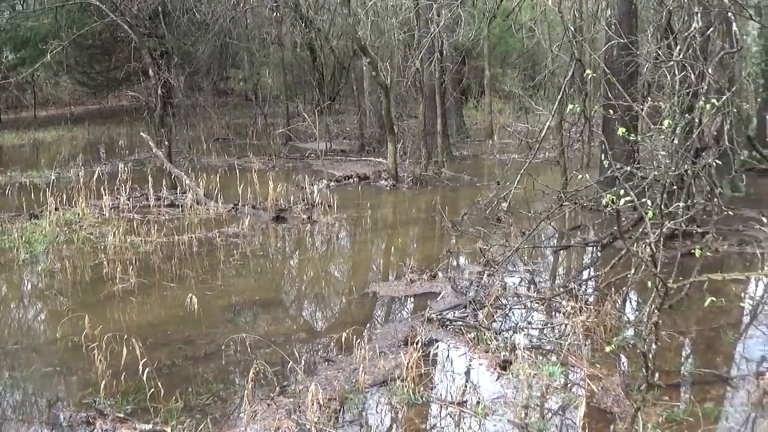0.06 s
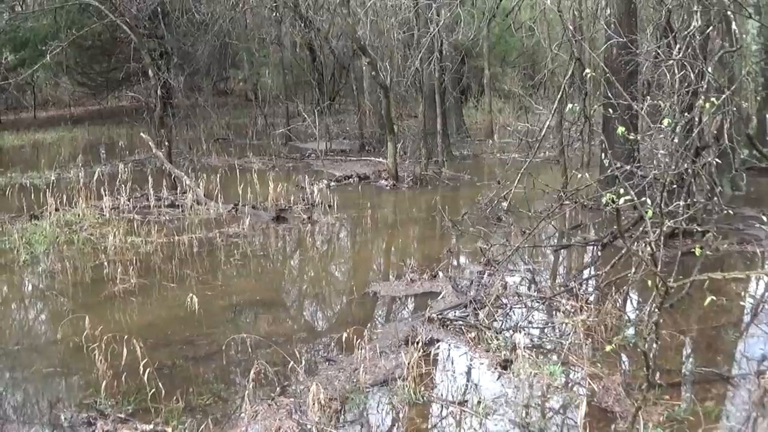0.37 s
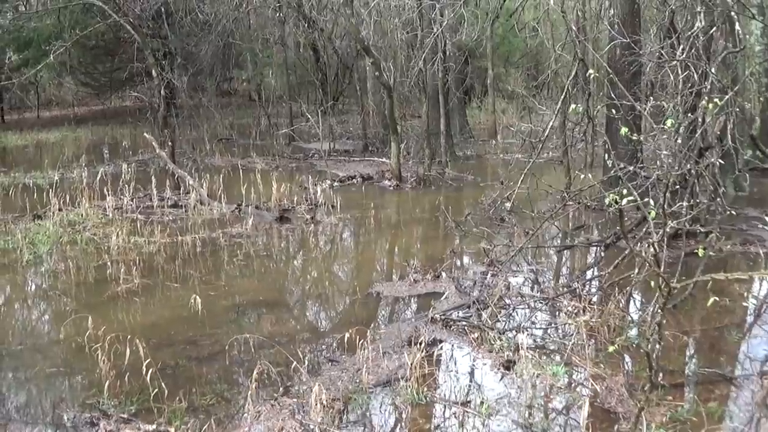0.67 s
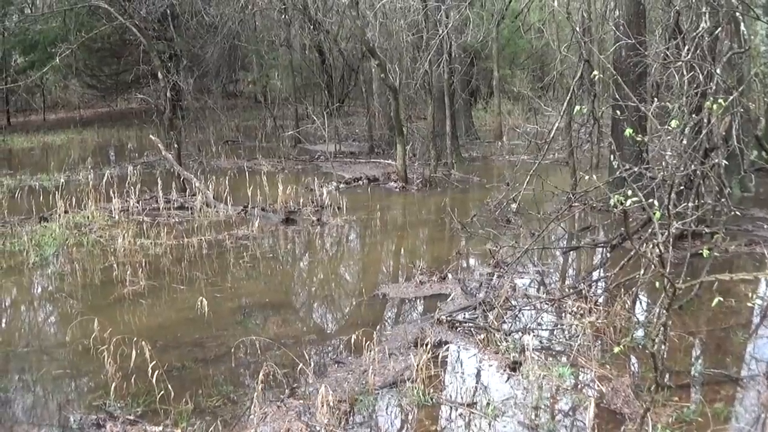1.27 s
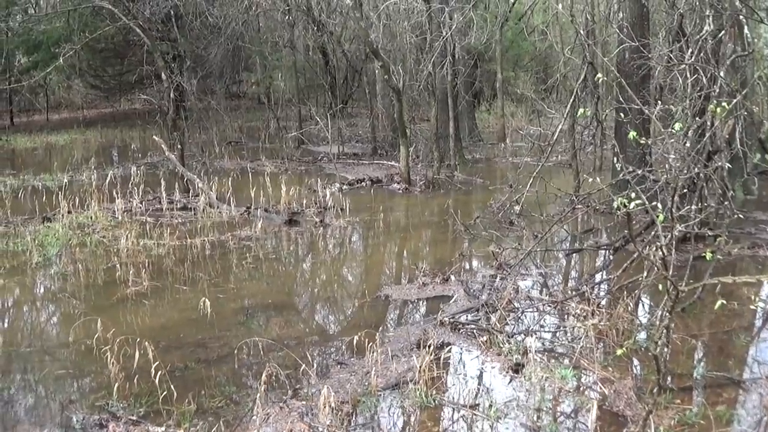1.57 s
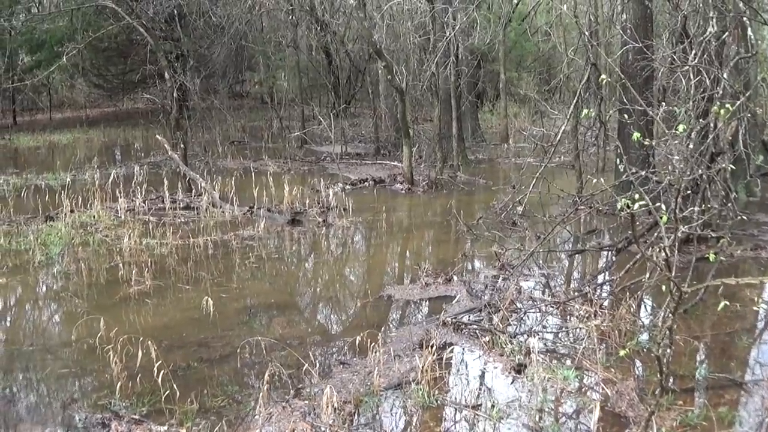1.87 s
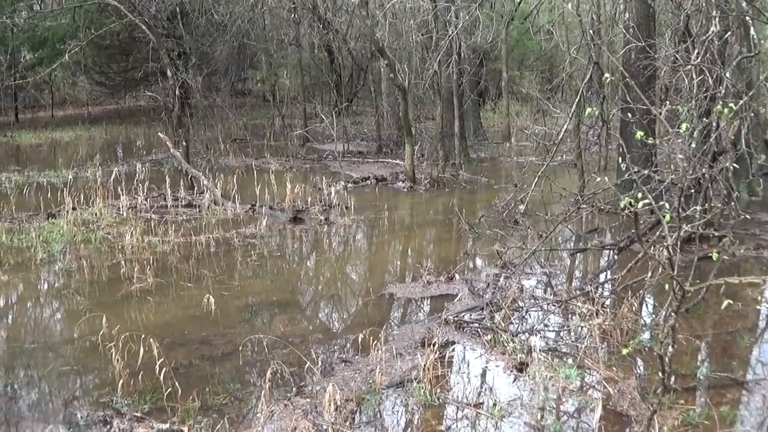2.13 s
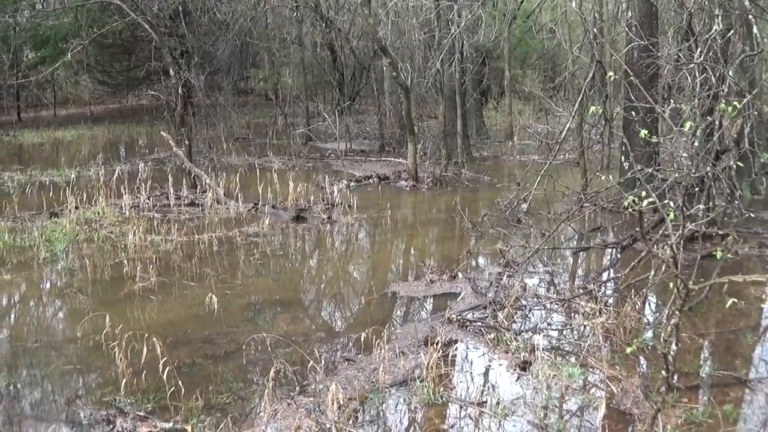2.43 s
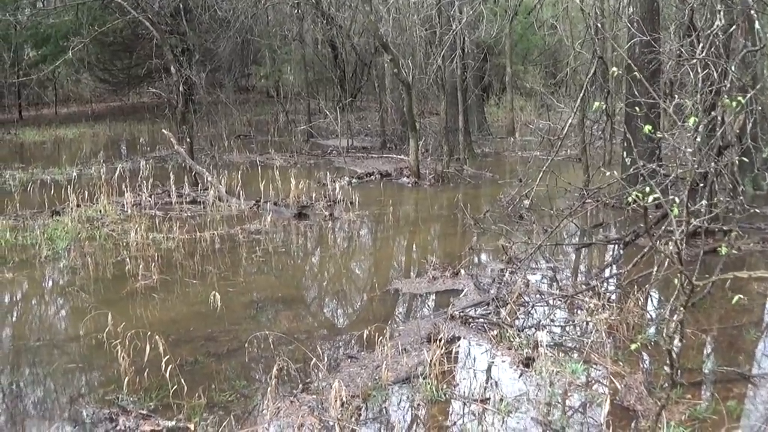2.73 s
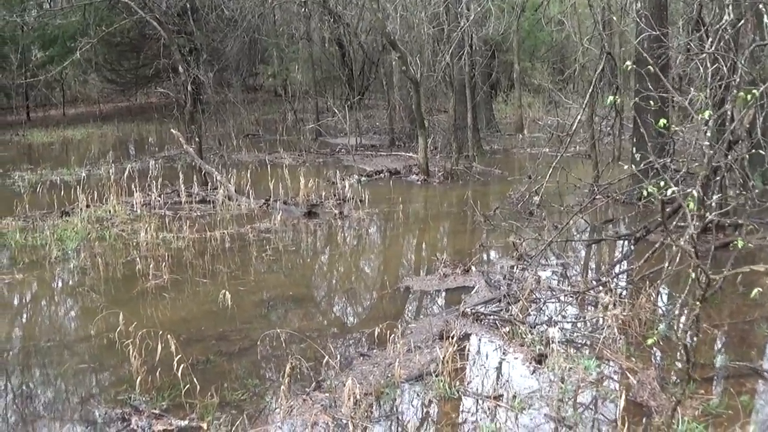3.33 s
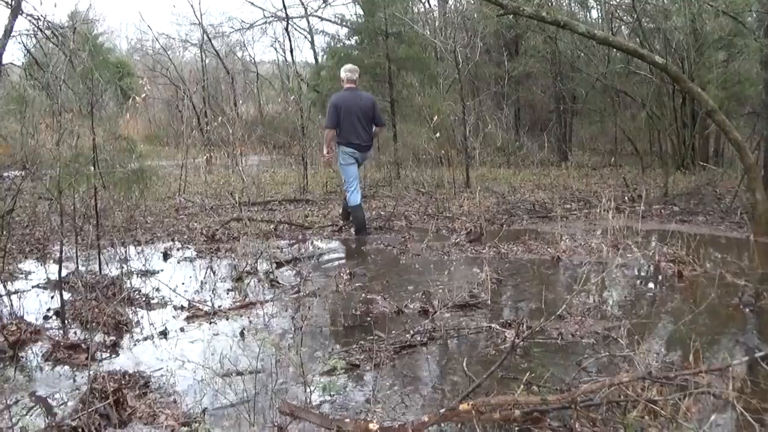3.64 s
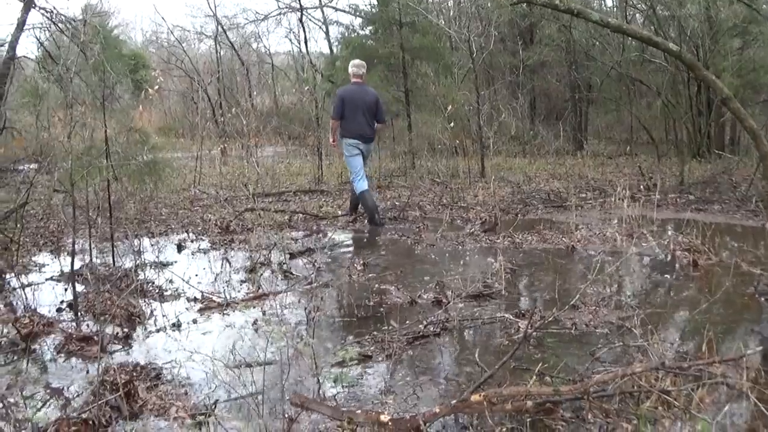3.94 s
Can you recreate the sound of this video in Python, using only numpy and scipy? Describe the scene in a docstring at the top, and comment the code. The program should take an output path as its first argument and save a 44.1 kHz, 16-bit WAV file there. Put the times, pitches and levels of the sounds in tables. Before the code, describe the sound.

Frogs call in trains of short pulses that slow and rise in pitch, a near one alternating with a distant, echoing one in a flooded wood. After a few close knocks, a boot splashes through shallow water.

```python
"""A near chorus frog calls first, then takes turns with a far one over a flooded wood: trains of short
pulses that slow down and rise in pitch. Each pulse rings in the vocal sac and scatters off tree trunks.
A thin insect chirp, far whistles and a low rumble lie behind, with a few knocks close by.
After a brief dropout the scene is another wet spot, where a boot splashes through shallow water and
leaves: damped resonances amid a crackle of spray."""
import sys
import numpy as np
from scipy import signal
from scipy.fft import rfft, irfft
from scipy.io import wavfile

SR = 44100
rng = np.random.default_rng(int(sys.argv[2]) if len(sys.argv) > 2 else 0)


def store_wav(level_fs):
    """Save 16-bit WAV to argv[1]."""
    pcm = np.round(np.clip(np.atleast_2d(level_fs), -1, 1) * 32767)
    wavfile.write(sys.argv[1], SR, pcm.T.astype(np.int16))


N = 176400

# Spectra of the noises and of the echoes. Each row: frequency in Hz, relative level in dB.
WOOD_AIR_SPECTRUM = [(15, -43), (25, -14), (64, 2.5), (249, -2), (317, -9), (545, -9.5), (1230, -17.5),
                     (1480, -19), (2840, -24), (3430, -25), (4250, -27), (9320, -31), (10100, -28.5),
                     (11000, -34), (16000, -37)]
SECOND_AIR_SPECTRUM = [(25, -14), (60, 1), (120, 4.5), (360, -4), (1000, -10), (2300, -12),
                       (3000, -12.5), (3500, -19), (6500, -30), (16000, -33)]
CRACK_SPECTRUM = [(300, -4), (900, 2.5), (4500, -1), (9000, -7.5), (12000, -13), (15000, -31)]
SPRAY_SPECTRUM = [(180, -35), (300, -14), (1490, -8), (1620, 3), (1820, -9), (3270, -5.5), (4320, -6.5),
                  (7180, -4), (15000, -24)]
ECHO_SPECTRUM = [(800, -6), (1700, 0), (2100, 1.5), (2600, 0), (3200, -1.5), (3600, 1), (4400, -2.5),
                 (5400, 4), (6800, -4), (12000, -9)]
# Stereo width. Each row: frequency in Hz, level of side over mid in dB.
WOOD_AIR_WIDTH = [(60, -43), (110, -38), (200, -26.5), (380, -13), (700, -9), (1290, -4), (2380, -2),
                  (4400, -7.5), (8120, -36.5), (15000, -33)]
SECOND_SPOT_WIDTH = [(60, -28), (110, -36), (200, -23), (380, -14), (700, -9), (1290, -8), (2380, -4.5),
                     (4400, -9), (8120, -22), (15000, -53)]
IMPACT_WIDTH = [(200, -22), (700, -17), (1500, -6), (3000, -15), (7000, -27), (10000, -42)]
ECHO_WIDTH = [(700, 1), (1700, -7.5), (3000, -6.5), (3700, -12.5), (5200, -38), (7000, -47), (10000, -45)]
# Envelopes of the wood's rumble and of the spray and wet leaves. Each row: time in seconds, level in dB.
WOOD_AIR_LEVELS = [(0.0, -42.5), (1.16, -39.5), (2.76, -39.5), (3.47, -36.5), (3.48, -34), (3.55, -40),
                   (3.66, -38)]
SPRAY_LEVELS = [(3.74, -56), (3.78, -41.5), (3.81, -45.5), (3.82, -39), (3.855, -34), (3.88, -39.5),
                (3.92, -43.5), (3.945, -31), (3.97, -41.5), (4.0, -44)]
# Insect chirps. Each row: start in seconds, pitch in Hz, relative level in dB.
INSECT_CHIRPS = [(0.0, 10090, -56), (.71, 10240, -57), (.87, 10350, -57.5), (1.04, 9960, -56),
                 (1.19, 10010, -52), (1.35, 9880, -52), (1.5, 9980, -56), (1.64, 10060, -54),
                 (1.79, 10090, -57.5), (1.95, 10020, -51), (2.11, 10110, -55), (2.26, 10080, -53.5),
                 (2.42, 10100, -54), (2.57, 10100, -55.5), (2.72, 10100, -53), (2.89, 10250, -53.5),
                 (3.05, 10170, -51.5), (3.21, 10170, -52.5), (3.36, 10250, -51.5), (3.51, 10170, -51)]
# Far whistles, probably birds. Each row: start in seconds, length in seconds, pitch in Hz, level in dB.
WHISTLE_NOTES = [(0.0, 0.093, 2460, -42.5), (.1, .12, 2450, -45.5), (.27, 0.088, 2430, -45.5),
                 (.35, 0.13, 2436, -49), (.45, 0.27, 2405, -51), (3.32, 0.12, 7100, -55.5),
                 (3.585, 0.068, 2460, -41)]
# Close knocks, and the boot's slaps and drops.
# Each row: start in seconds, level in dB, resonance in Hz, level of crack over resonance in dB.
CLOSE_KNOCKS = [(2.267, -40, 7000, -25), (3.338, -30.5, 1310, -23), (3.402, -30, 1480, -17),
                (3.4785, -18.5, 1160, -9), (3.486, -30, 1610, -6.5), (3.6555, -21.5, 1850, -4.5)]
BOOT_SPLASHES = [(3.8145, -23, 780, 1), (3.823, -28, 7000, 1), (3.8295, -21, 910, -12),
                 (3.8425, -19.5, 1760, -5), (3.853, -27, 1800, -5), (3.93, -23.5, 1520, -1),
                 (3.941, -20.5, 4550, -2), (3.992, -24, 1900, -8)]
# Frog pulses. Each row: start in seconds, relative level in dB, pitch of the loudest partial in Hz.
NEAR_CALLS = [(0.0278, -15.5, 3290), (0.1032, -14.5, 3356), (0.1875, -12.5, 3385), (0.2793, -11.5, 3407),
              (0.3765, -11.5, 3440), (0.4753, -11.5, 3425), (0.5656, -14.5, 3590), (2.2523, -34, 2920),
              (2.2877, -24, 3000), (2.3336, -22, 3070), (2.384, -19.5, 3140), (2.4384, -16.5, 3135),
              (2.4992, -15, 3270), (2.5646, -12.5, 3320), (2.6354, -11, 3300), (2.7122, -8, 3385),
              (2.799, -8.5, 3380), (2.8883, -8.5, 3414), (2.9861, -9.5, 3444), (3.0834, -9, 3534),
              (3.1662, -12, 3736)]
FAR_CALLS = [(0.7507, -32.5, 3020), (0.7912, -27, 3070), (0.8439, -26.5, 3240), (0.8977, -24, 3300),
             (0.9574, -21.5, 3340), (1.0241, -22, 3320), (1.0955, -21, 3340), (1.1721, -22, 3355),
             (1.2575, -22, 3340), (1.3414, -21, 3320), (1.4206, -24, 3870), (3.322, -29.5, 2970),
             (3.361, -27, 3020), (3.4127, -24, 3240), (3.468, -23, 3200), (3.5271, -19.5, 3220),
             (3.5922, -20.5, 3250), (3.6624, -28, 3310)]
# Pitch of the echoes, climbing through each call. Each row: time in seconds, pitch in Hz.
NEAR_ECHO_PITCH = [(0.03, 3274), (.19, 3422), (.38, 3554), (.57, 3630), (2.25, 3100), (2.5, 3190),
                   (2.8, 3470), (2.99, 3570), (3.17, 3697)]
FAR_ECHO_PITCH = [(.75, 3090), (.96, 3306), (1.26, 3493), (1.339, 3670), (1.42, 3796), (3.32, 3060),
                  (3.53, 3270), (3.66, 3340)]
# Partials of the voices. Each row: multiple of the fundamental, relative level in dB.
NEAR_PARTIALS = [(1, -38), (2, 0), (3, -23.5), (4, -30)]
FAR_PARTIALS = [(1, -26), (2, 0.5), (3, -20), (4, -31.5)]
# Rasp of the opening larynx, coloured by the body. Each row: frequency in Hz, relative level in dB.
NEAR_RASP_SPECTRUM = [(600, -26), (1200, -7.5), (1600, 6.5), (2200, -15), (2800, -2), (4000, 1.5),
                      (5000, -1.5), (6800, -13), (7600, -31), (15000, -41)]
FAR_RASP_SPECTRUM = [(600, -27), (1300, -4), (1700, 9), (2300, -10), (2900, -2), (3900, 2), (4600, -7),
                     (5400, -10), (6600, -17.5), (9000, -26)]

ATTACK_S, RELEASE_S, HOLD_SHARE, HOLD_MAX_S = 0.00055, 0.0021, 0.053, 0.0035
ONSET_SHARP, SETTLE_S, RASP_ATTACK_S, RASP_DECAY_S = 0.048, 0.00059, 0.00054, 0.0038
PUSH_DB_PER_S, NEUTRAL_PAUSE_S = 110, 0.082  # between longer pauses the frog pushes harder
CATCH_S, CATCH_WIDTH_S, CATCH_DEPTH, CATCH_SAG = 0.0023, 0.00051, 0.29, 0.048  # dip in level and pitch


def undb(db):
    """Amplitude grows tenfold with every 20 dB."""
    return 10 ** (np.asarray(db) / 20)


def unit(x):
    """Normalisation to an rms of 1."""
    return x / np.sqrt(np.mean(x ** 2))


def curve(rows):
    """Linear interpolation of (seconds, value) rows over the whole duration."""
    return np.interp(np.arange(N) / SR, *np.array(rows).T)


def colour(x, spectrum):
    """Filtering multiplies the spectrum by a gain curve of (Hz, dB) points."""
    hz, db = np.array(spectrum, float).T
    bins_hz = np.maximum(np.fft.rfftfreq(len(x), 1 / SR), 1)
    return irfft(rfft(x) * undb(np.interp(np.log(bins_hz), np.log(hz), db)), len(x))


def noise(spectrum):
    """Filtered white noise takes on the filter's spectrum; its rms is 1."""
    return unit(colour(rng.standard_normal(N), spectrum))


def flutter(width_hz):
    """Random complex modulation, which spreads a tone into a narrow, wavering band."""
    hz = np.fft.fftfreq(N, 1 / SR)
    white = rng.standard_normal(N) + 1j * rng.standard_normal(N)
    modulation = np.fft.ifft(white / (1 + (hz / width_hz) ** 4))
    return modulation / np.std(modulation)


def stereo(mid, side):
    """Left and right are the sum and difference of mid and side."""
    return np.array([mid + side, mid - side])


def add(out, start_s, x):
    """Superposition: a sound adds to the mix from its start time."""
    i = int(np.clip(start_s * SR, 0, N - 1))
    out[i:i + len(x)] += x[:N - i]


def diffuse_field(spectrum, width):
    """Diffuse noise is alike on both sides in the bass, where wavelengths are long."""
    return stereo(noise(spectrum), colour(noise(spectrum), width))


def wavering_tone(hz, width_hz):
    """A randomly modulated carrier is heard as a narrow band of noise."""
    carrier = np.exp(2j * np.pi * hz * np.arange(N) / SR)
    return np.sqrt(2) * (flutter(width_hz) * carrier).real


def wood_air():
    """Broadband rumble underlies two narrow bands: a hum and the wash of a distant chorus."""
    rumble = diffuse_field(WOOD_AIR_SPECTRUM, WOOD_AIR_WIDTH) * undb(curve(WOOD_AIR_LEVELS))
    hum = undb(-56) * wavering_tone(hz=69.8, width_hz=4.8)
    chorus = undb(-56) * wavering_tone(hz=3260, width_hz=220)
    return rumble + hum + chorus


def distant_notes(rows, glide_hz, width_hz):
    """Gliding tones swell and fade; random modulation gives the blur of distance."""
    out, blur = np.zeros(N), flutter(width_hz)
    for start, length, hz, db in rows:
        progress = np.linspace(0, 1, int(length * SR))
        carrier = np.exp(2j * np.pi * np.cumsum(hz + glide_hz * (progress - .5)) / SR)
        tone = (carrier * np.roll(blur, -int(start * SR))[:len(progress)]).real
        swell = np.abs(np.sin(np.pi * progress ** 0.54)) ** 0.4
        add(out, start, np.sqrt(2) * undb(db) * swell * tone)
    return out


def insect(chirp_s=0.15):
    """A narrow band near 10 kHz, gliding slightly upward, is heard as a thin chirp."""
    rows = [(start, chirp_s, hz, db) for start, hz, db in INSECT_CHIRPS]
    return undb(-1.5) * distant_notes(rows, glide_hz=49, width_hz=85)


def whistlers():
    """Nearly pure tones, gliding slightly downward, are heard as far whistles."""
    return distant_notes(WHISTLE_NOTES, glide_hz=-17, width_hz=51)


def impacts(rows, decay_s, spread, attack_s=0.00046):
    """Each impact excites a broad, damped resonance together with a broadband crack."""
    mid, side = np.zeros((2, N))
    t = np.arange(SR // 20) / SR
    envelope = (1 - np.exp(-t / attack_s)) * np.exp(-t / decay_s)
    for channel in (mid, side):
        cracks = noise(CRACK_SPECTRUM)
        for k, (start, db, hz, crack_db) in enumerate(rows):
            band = signal.butter(1, [hz / (1 + spread), hz * (1 + spread)], "band", fs=SR)
            body = unit(signal.lfilter(*band, signal.lfilter(*band, rng.standard_normal(len(t)))))
            crack = undb(crack_db) * cracks[k * len(t):(k + 1) * len(t)]
            add(channel, start, undb(db) * envelope * (body + crack))
    return stereo(mid, colour(side, IMPACT_WIDTH))


def wading_boot():
    """A boot strikes the water; spray and leaves crackle as noise under rapid amplitude modulation."""
    grains = unit(undb(2.6 * flutter(width_hz=250).real))
    slaps = impacts(BOOT_SPLASHES, decay_s=0.0032, spread=0.3)
    spray = diffuse_field(SPRAY_SPECTRUM, SECOND_SPOT_WIDTH) * grains * undb(curve(SPRAY_LEVELS))
    return slaps + spray


def trunk_echoes(x, early_t60_s=0.66, late_t60_s=1.97, late_db=-19.5, delay_s=0.005):
    """Scattering by trunks gives dense echoes, mid and side: a quick decay and a faint long one."""
    t = np.arange(SR * 3 // 2) / SR
    decay = (1000 ** (-t / early_t60_s) + undb(late_db) * 1000 ** (-t / late_t60_s)) * (t > delay_s)
    response = decay / np.sqrt(np.sum(decay ** 2)) * rng.standard_normal((2, len(t)))
    return signal.fftconvolve(x[None], response, axes=1)


def vocal_pulse(hz, pause_s, partials, wobble, rasp):
    """A damped oscillation: the pulse starts sharp, catches, holds and rings out in the vocal sac."""
    t = np.arange(len(rasp)) / SR
    hold_s = min(HOLD_SHARE * pause_s, HOLD_MAX_S)
    push = undb(PUSH_DB_PER_S * (pause_s - NEUTRAL_PAUSE_S))
    catch = np.exp(-((t - CATCH_S) / CATCH_WIDTH_S) ** 2) * push ** 2
    envelope = (1 - np.exp(-t / ATTACK_S)) * np.exp(-np.maximum(t - hold_s, 0) / RELEASE_S)
    fundamental_hz = hz / 2 * (1 + ONSET_SHARP * np.exp(-t / SETTLE_S) - CATCH_SAG * catch + wobble)
    phase = 2 * np.pi * np.cumsum(fundamental_hz) / SR
    # The second harmonic dominates; pushing strengthens the other partials and the rasp.
    tone = sum(undb(db) * (1 if k == 2 else push) * np.sin(k * phase) for k, db in partials)
    rasp_envelope = (1 - np.exp(-(t / RASP_ATTACK_S) ** 2)) * np.exp(-t / RASP_DECAY_S)
    return envelope * (1 - CATCH_DEPTH * catch) * tone + push * rasp_envelope * rasp


def frog(pulses, echo_pitch, partials, rasp_spectrum, rasp_db, jitter, direct_db, echo_db):
    """A frog's pulse trains arrive as direct sound plus the reverberant field of the wood."""
    direct, mid, side = np.zeros((3, N))
    pulse_samples = SR // 50
    rasp = undb(rasp_db) * noise(rasp_spectrum)
    wobble = jitter * flutter(width_hz=400).real
    gaps = np.diff([row[0] for row in pulses])
    pauses = np.minimum(np.r_[gaps[0], gaps], np.r_[gaps, gaps[-1]])  # the shorter neighbouring gap
    for k, ((start, db, hz), pause_s) in enumerate(zip(pulses, pauses)):
        own = slice(k * pulse_samples, (k + 1) * pulse_samples)
        voice = (pause_s, partials, wobble[own], rasp[own])
        add(direct, start, undb(db) * vocal_pulse(hz, *voice))
        echo_hz = np.interp(start, *np.array(echo_pitch).T)
        echo_mid, echo_side = undb(db) * trunk_echoes(vocal_pulse(echo_hz, *voice))
        add(mid, start, echo_mid)
        add(side, start, echo_side)
    echoes = stereo(colour(mid, ECHO_SPECTRUM), colour(colour(side, ECHO_SPECTRUM), ECHO_WIDTH))
    return undb(direct_db) * direct + undb(echo_db) * echoes


def two_frogs():
    """The ratio of direct sound to echo conveys distance: the far, raspier frog is mostly echo."""
    near = frog(NEAR_CALLS, NEAR_ECHO_PITCH, NEAR_PARTIALS, NEAR_RASP_SPECTRUM,
                rasp_db=-16, jitter=0.015, direct_db=0.5, echo_db=-2)
    far = frog(FAR_CALLS, FAR_ECHO_PITCH, FAR_PARTIALS, FAR_RASP_SPECTRUM,
               rasp_db=-9, jitter=0.024, direct_db=-1.5, echo_db=4)
    pan_left = undb([[1.5], [-1.5]])
    return near + far * pan_left


def scene():
    """Sources superpose in each place: the flooded wood and, after a brief dropout, the second spot."""
    t = np.arange(N) / SR
    wood = two_frogs() + insect() + whistlers() + wood_air()
    wood += impacts(CLOSE_KNOCKS, decay_s=0.004, spread=0.45)
    second_spot = undb(-38) * diffuse_field(SECOND_AIR_SPECTRUM, SECOND_SPOT_WIDTH) + wading_boot()
    dropout_s, change_s, fade_s = 3.672, 3.692, 0.0068
    fade_out = np.clip((dropout_s - t) / fade_s, .01, 1) * (t < change_s)
    fade_in = np.clip((t - change_s) / fade_s + .5, 0, 1)
    return wood * fade_out + second_spot * fade_in


def record(dry):
    """Band limiting: a steep low-pass filter removes the highest treble."""
    cutoff_hz = 15900
    return signal.sosfilt(signal.ellip(10, .2, 80, cutoff_hz, fs=SR, output="sos"), dry)


dry = scene()
out = record(dry)
store_wav(out)
```